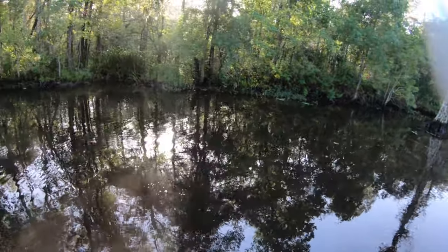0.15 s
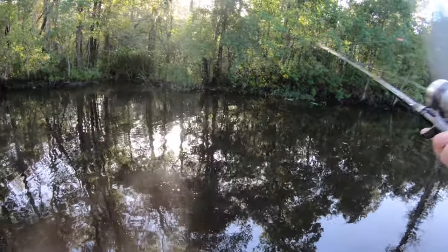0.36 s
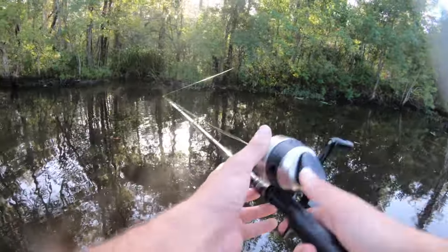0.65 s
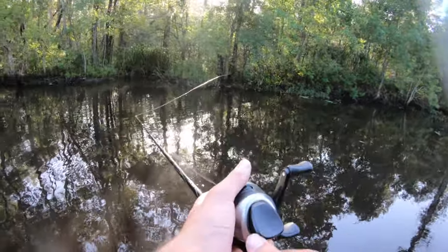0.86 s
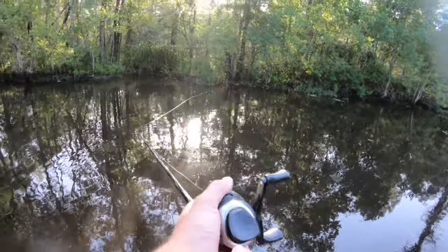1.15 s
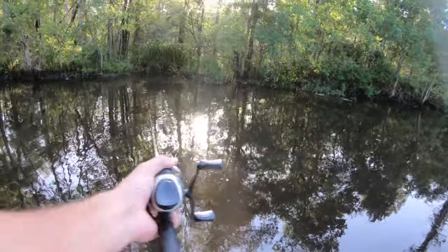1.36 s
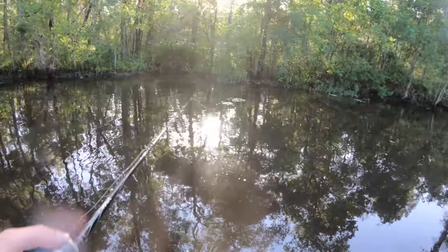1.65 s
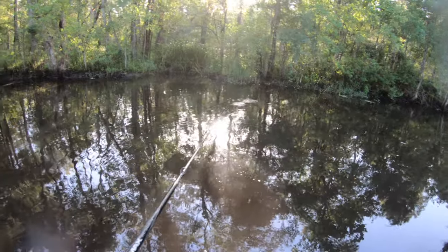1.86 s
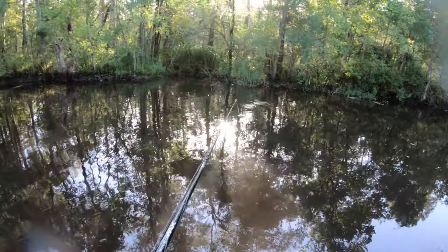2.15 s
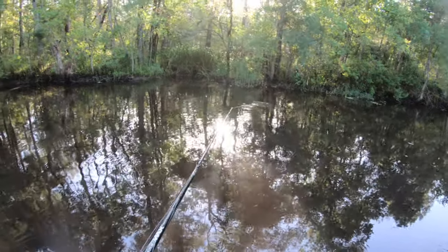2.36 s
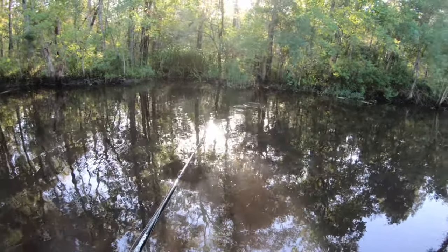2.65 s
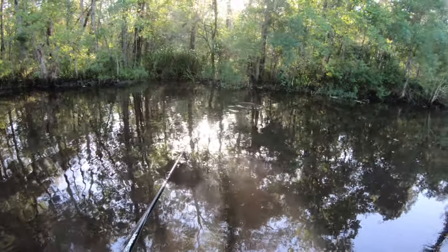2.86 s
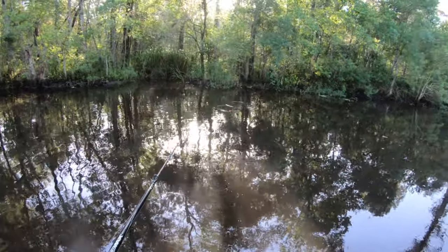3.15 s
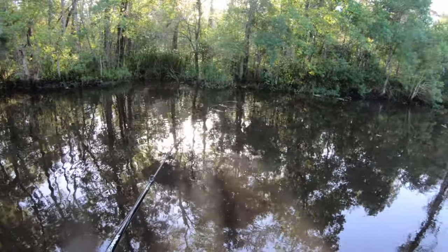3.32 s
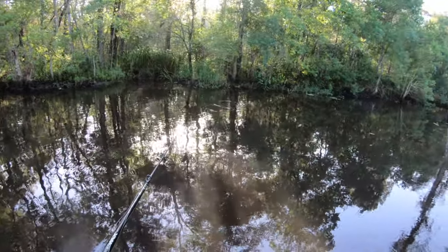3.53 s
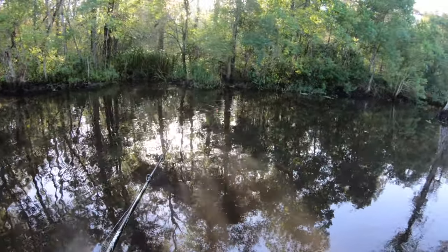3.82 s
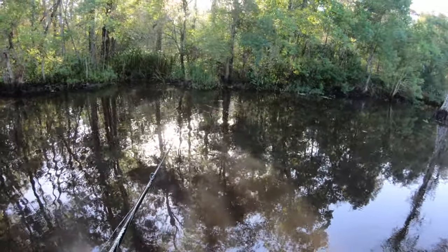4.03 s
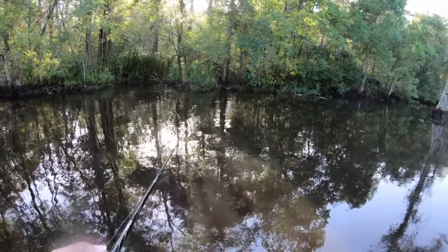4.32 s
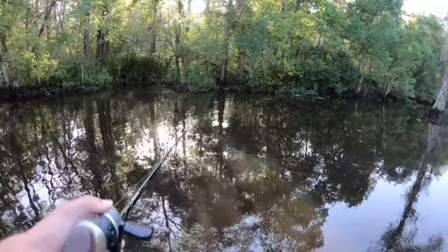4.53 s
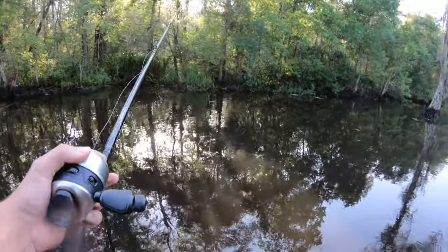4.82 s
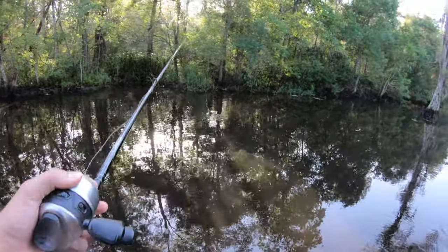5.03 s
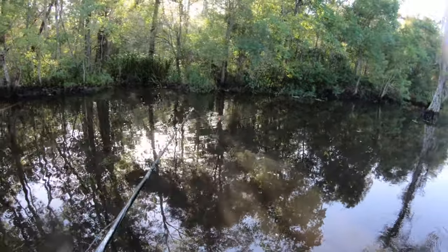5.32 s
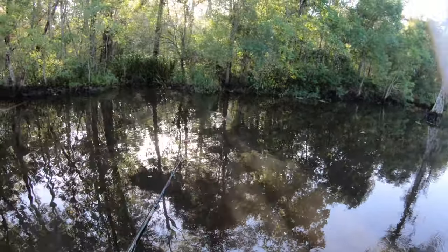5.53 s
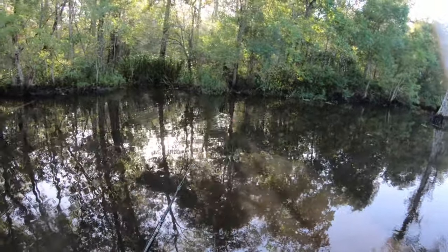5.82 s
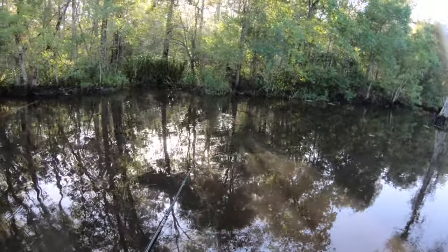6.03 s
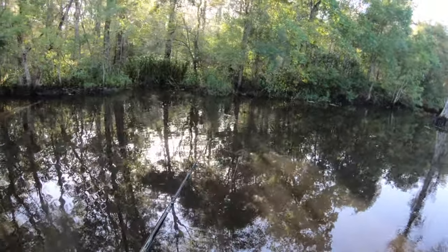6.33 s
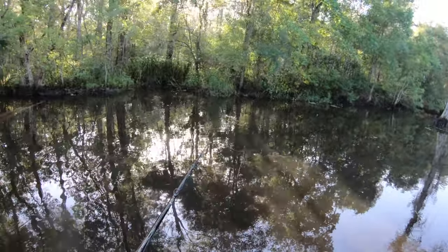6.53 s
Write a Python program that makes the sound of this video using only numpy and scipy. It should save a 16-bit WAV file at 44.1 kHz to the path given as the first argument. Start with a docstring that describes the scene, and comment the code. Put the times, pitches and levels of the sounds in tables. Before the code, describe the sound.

A fishing reel taps, then snaps loudly twice with a brief spring ring, while birds chirp over still swamp water and a distant engine drones.

```python
"""Hands work a fishing reel: taps excite the decaying modes of its housing, its latch snaps twice, a spring rings.
The microphone is worn on the body, whose sway pushes slow pressure waves into it; grainy noise puffs are rubbing
and the tail of the latch snap. Around lies still swamp water among trees: gliding tones are birds near and far,
with echoes as decaying noise. Behind them insects hiss as throbbing noise bands, an engine and other hums drone
in the distance as wavering sines, and filtered noise gives the murmur of the air and low puffs of wind."""
import sys
import numpy as np
from scipy import signal
from scipy.fft import rfft, irfft
from scipy.io import wavfile
from scipy.ndimage import uniform_filter1d

SR = 44100
rng = np.random.default_rng(int(sys.argv[2]) if len(sys.argv) > 2 else 0)


def nominal_scale(level):
    """Amplitude ratio for a level in decibels (scalar or array-like)."""
    x = np.asarray(level, float) / 20
    return 10 ** x


def transcribe(signal):
    """Save signal, clipped to [-1, 1], as a 16-bit WAV file at the path in sys.argv[1]."""
    frames = np.atleast_2d(signal).T
    limited = np.clip(frames, -1, 1)
    pcm = np.round(limited * 32767).astype(np.int16)
    wavfile.write(sys.argv[1], SR, pcm)


N = 294676  # length in samples


def evened(x):
    """Power normalisation: scales a signal to rms 1."""
    return x / np.sqrt(np.mean(x ** 2) + 1e-20)


def curve(rows):
    """Linear interpolation: joins (t/s, value) rows into one value per sample."""
    return np.interp(np.arange(N) / SR, *np.transpose(rows))


def shaped(gain, size=N):
    """Spectral shaping: white noise filtered by gain(f/Hz), then set to rms 1."""
    hz = np.fft.rfftfreq(size, 1 / SR) + 1e-3
    return evened(irfft(rfft(rng.standard_normal(size)) * gain(hz), size))


def bell(hz, centre_hz, octaves):
    """Gaussian response on the log-frequency axis; octaves is the standard deviation."""
    return np.exp(-.5 * (np.log2(hz / centre_hz) / octaves) ** 2)


def add(mix, s, sound):
    """Superposition: adds a sound into the mix from time s."""
    part = mix[round(s * SR):][:len(sound)]
    part += sound[:len(part)]


# spectrum of outdoor murmur and microphone hiss [f/Hz, relative density level/dB]
AIR_SPECTRUM = [(15, -11.5), (25, -3), (40, -15.5), (60, -10.5), (110, -22.5), (250, -29.5), (390, -40.5),
                (600, -43), (1200, -48.5), (2500, -52), (5200, -53), (8400, -48), (16000, -52.5)]


def air_colour(hz):
    """Spectral density of the air noise, interpolated over log frequency."""
    table_hz, level_db = np.transpose(AIR_SPECTRUM)
    return nominal_scale(np.interp(np.log(hz), np.log(table_hz), level_db)) * (hz > 12)


def low_share(hz):
    """Power-complementary crossover: the share of power below about 70 Hz."""
    return 1 / (1 + (hz / 70) ** 4)


def murmur():
    """Stationary broadband noise: the steady upper part of the air sound."""
    return nominal_scale(-42.5) * shaped(lambda hz: air_colour(hz) * np.sqrt(1 - low_share(hz)))


# low puffs of wind [t/s, level/dB]
PUFFS = [(0.05, -38), (0.55, -38), (1.36, -34.5), (1.66, -35), (3.39, -39), (4.0, -41), (4.89, -36),
         (6.5, -42)]


def gusts():
    """Amplitude modulation: low noise swells in Gaussian puffs over a drifting calm."""
    puff_s, calm_db, drift_db = .07, -52, 4
    t = np.arange(N) / SR
    calm = nominal_scale(calm_db + drift_db * shaped(lambda hz: bell(hz, 2.5, 1.2)))
    puffs = sum(nominal_scale(level_db) * np.exp(-((t - s) / puff_s) ** 2) for s, level_db in PUFFS)
    rumble = shaped(lambda hz: air_colour(hz) * np.sqrt(low_share(hz)) * (hz > 20))
    return (calm + puffs) * rumble


# body sway below hearing [t/s, level/dB]
SWAY_LEVEL = [(0.1, -15), (0.37, -12), (0.51, -29), (0.94, -18), (1.2, -33), (1.8, -12), (2.5, -23),
              (2.96, -19), (3.36, -27), (3.75, -18.5), (4.54, -26), (4.94, -11), (5.5, -26), (5.7, -16),
              (6.16, -17), (6.33, -35)]


def sway():
    """Infrasonic pressure: slow noise, its running power levelled so that the table sets the swing."""
    centre_hz, width_hz = 5.9, 3.8
    swing = shaped(lambda hz: hz / (1 + hz) / (1 + ((hz - centre_hz) / width_hz) ** 4))
    swing /= np.sqrt(uniform_filter1d(swing ** 2, 12000) + 0.017)
    return nominal_scale(curve(SWAY_LEVEL)) * swing


# insect choruses [f/Hz, width/Hz (two standard deviations), level/dB, throb centre f/Hz, throb depth/dB rms]
INSECT_BANDS = [(6504, 750, -57.5, 27, 1), (7195, 330, -58.5, 39, 1.5), (7550, 305, -55, 20, 1),
                (12050, 3730, -51.5, 56, 1)]


def insects():
    """Amplitude modulation: many wings blur into narrow noise bands that throb and drift."""
    out = np.zeros(N)
    for centre_hz, width_hz, level_db, throb_hz, depth_db in INSECT_BANDS:
        band = shaped(lambda hz: np.exp(-.5 * ((hz - centre_hz) / width_hz * 2) ** 2))
        throb = shaped(lambda hz: bell(hz, throb_hz, 0.95))
        drift = shaped(lambda hz: bell(hz, .8, 1.2))
        out += band * nominal_scale(level_db + depth_db * throb + 0.63 * drift)
    return out


# engine drawing away [t/s, firing f/Hz, relative level/dB]
ENGINE_COURSE = [(0, 42.24, 1.5), (2.2, 41.94, 3.5), (5.0, 41.67, 0), (6.68, 40.92, -3)]
# partials; fractional multiples are other hums, not of this engine, moved along the same course
# [multiple of firing f, relative rms level/dB]
PARTIALS = [(2, -50), (3, -52.5), (4, -55), (6, -58.5), (7, -63), (8, -63.5), (10, -65.5), (12, -72),
            (14, -74), (.79, -46), (4.55, -59.5), (5.4, -61.5)]


def engine():
    """Additive synthesis: firing orders and other hums waver in level and phase as the air path shifts."""
    s, firing_hz, level_db = np.transpose(ENGINE_COURSE)
    turns = np.cumsum(curve(list(zip(s, firing_hz)))) / SR
    out = np.zeros(N)
    for multiple, partial_db in PARTIALS:
        fade = shaped(lambda hz: bell(hz, 1.63, 0.94))
        wobble = shaped(lambda hz: bell(hz, 2.55, 0.95))
        phase = 2 * np.pi * (multiple * turns + rng.random()) + 0.71 * wobble
        out += np.sqrt(2) * nominal_scale(partial_db + 2.58 * fade) * np.sin(phase)
    return out * nominal_scale(curve(list(zip(s, level_db))))


def trees(x, t60):
    """Reverberation: sparse echoes from trunks and banks build up and die; moving air smears their pitch."""
    echo_share, blur_hz = .15, 150  # share of samples that hold an echo; spread of the smearing
    t = np.arange(SR // 2) / SR
    sparse = rng.standard_normal(len(t)) * (rng.random(len(t)) < echo_share)
    echoes = sparse * nominal_scale(-60 * t / t60) * (1 - np.exp(-t / 0.0031))
    shimmer = shaped(lambda hz: np.exp(-.5 * (hz / blur_hz) ** 2))
    return (.8 + .55 * shimmer) * signal.fftconvolve(x, echoes / np.linalg.norm(echoes))[:N]


def whistle(rows):
    """Frequency modulation: a near sine follows (t/s, f/Hz, level/dB) rows."""
    s, hz, level_db = np.transpose(rows)
    t = np.arange(0, s[-1], 1 / SR)
    tone = np.sin(2 * np.pi * np.cumsum(np.interp(t, s, hz)) / SR)
    return nominal_scale(np.interp(t, s, level_db)) * tone * signal.windows.tukey(len(t), .25)


# countless far chirps together [t/s, level/dB]
CHORUS_LEVEL = [(0, -70), (3.3, -70), (3.7, -64), (4.9, -61), (5.6, -66), (6.0, -72), (6.68, -68)]


def chorus():
    """Random superposition: short gliding chirps, too far off to tell apart."""
    centre_hz, spread_octaves, chirps_per_s = 2900, .2, 130
    out = np.zeros(N)
    for when, pitch, glide, size in rng.random((round(chirps_per_s * N / SR), 4)):
        octaves = spread_octaves * np.log(pitch / (1 - pitch))  # logistic scatter
        hz = np.clip(centre_hz * 2 ** octaves, 1400, 5200)
        end = (.01 + .03 * size, hz * (.9 + .2 * glide), -6 * size)  # longer chirps are softer
        add(out, when * N / SR, whistle([(0, hz, -6 * size), end]))
    return nominal_scale(curve(CHORUS_LEVEL)) * evened(out)


# far bird, a high note then a low one [t/s, high level/dB, low level/dB]
FAR_SONG = [(3.54, -69, -68), (3.815, -61, -68), (4.15, -62, -68), (4.38, -64, -67), (4.71, -66, -66),
            (4.99, -61, -67), (5.3, -61, -67), (5.62, -66, -67)]


def far_bird():
    """Tone pairs, high then low, whose frequency sags linearly as the song goes on."""
    sag_hz_per_s, high_s, low_s, low_wait_s = 55, .04, .1, .11
    out = np.zeros(N)
    for s, high_db, low_db in FAR_SONG:
        sag_hz = sag_hz_per_s * (s - FAR_SONG[0][0])
        high_hz, low_hz = 3000 - sag_hz, 2745 - sag_hz
        add(out, s, whistle([(0, high_hz, high_db), (high_s, high_hz, high_db - 4)]))
        add(out, s + low_wait_s, whistle([(0, low_hz, low_db), (low_s, low_hz, low_db)]))
    return out


# lone gliding whistles [t/s, length/s, relative level/dB, start f/Hz, end f/Hz]
GLIDES = [(.205, .06, -59, 3550, 3130), (0.414, 0.02, -49.5, 3550, 3490), (1.324, 0.014, -52, 3300, 3950),
          (1.743, 0.012, -52, 1530, 1600), (2.07, 0.015, -54, 3550, 4070), (2.335, .048, -61, 3660, 3680),
          (4.06, .15, -62, 3800, 3780), (4.41, .062, -57, 1645, 1655), (4.48, .03, -57, 3280, 3300),
          (4.755, .09, -62, 4270, 4250)]


def single_notes():
    """Linear frequency glides at constant level."""
    out = np.zeros(N)
    for s, length, level_db, start_hz, end_hz in GLIDES:
        add(out, s, nominal_scale(level_db) * whistle([(0, start_hz, -2), (length, end_hz, -2)]))
    return out


# one arched note [t/s after start, share of top f, relative level/dB]
ARCHED_NOTE = [(0, .89, -4), (.011, 1, 0), (.022, .96, -5)]
# its repeats [t/s, level/dB, top f/Hz]
TWITTERS = [(0.063, -53, 3800), (.115, -51, 4000), (.688, -51, 3850), (.738, -46, 3850), (.795, -54, 3750),
            (.855, -54, 3700), (.905, -57, 3600), (2.69, -64, 3620), (2.745, -61, 3660), (2.815, -63, 3650),
            (2.91, -62, 3580), (2.95, -61, 3700), (3.005, -59, 3660), (3.09, -63, 3600)]


def twittering_bird():
    """Frequency scaling: one arched contour repeats at varying top pitch."""
    out = np.zeros(N)
    for s, level_db, top_hz in TWITTERS:
        add(out, s, nominal_scale(level_db) * whistle(np.array(ARCHED_NOTE) * [1, top_hz, 1]))
    return out


# low note just before each hook [t/s after start, f/Hz, relative level/dB]
PICKUP_NOTE = [(0, 3060, -3), (.009, 3210, 1), (.018, 3340, -4)]
# hooked note [t/s after start, f/Hz, relative level/dB]
HOOKED_NOTE = [(0, 4460, 3), (.012, 4500, 0), (.024, 4700, 0), (.034, 4280, 4.5), (.046, 3990, 5),
               (.06, 3970, 2)]
# repeats of the hook [t/s, level/dB]
HOOK_TIMES = [(0.156, -54), (1.247, -55), (1.806, -52.5), (6.488, -58)]


def hooking_songbird():
    """Frequency contour: a low rising note leads into one that rises, then drops."""
    out = np.zeros(N)
    for s, level_db in HOOK_TIMES:
        add(out, s - .021, nominal_scale(level_db) * whistle(PICKUP_NOTE))
        add(out, s, nominal_scale(level_db) * whistle(HOOKED_NOTE))
    return out


# soft falling lead-in [t/s after start, f/Hz, relative level/dB]
FALLING_NOTE = [(0, 5000, -19), (.008, 4802, -1), (.016, 4550, 7)]
# fast rise [t/s after start, f/Hz, relative level/dB]
RISING_NOTE = [(0, 3750, -8), (.004, 3950, -3), (.016, 4900, 0), (.023, 5200, -4)]
# repeats of the pair [lead-in t/s, rise level/dB, lead-in level/dB]
CHIP_TIMES = [(3.421, -49.5, -70), (3.709, -43.5, -53.5), (3.998, -46.5, -56), (4.286, -47, -54),
              (4.585, -48, -54), (4.886, -53.5, -62), (5.194, -49, -60)]


def chipping_bird():
    """Frequency sweeps: a falling lead-in, then a fast rise."""
    rise_wait_s = .021
    out = np.zeros(N)
    for s, level_db, lead_db in CHIP_TIMES:
        add(out, s, nominal_scale(lead_db) * whistle(FALLING_NOTE))
        add(out, s + rise_wait_s, nominal_scale(level_db) * whistle(RISING_NOTE))
    return out


def birds():
    """Direct-to-reverberant ratio: near birds are clear with an echo, the far one is mostly echo."""
    air_path = shaped(lambda hz: bell(hz, 67, 0.65))  # level flutter, 2 dB near and 4 dB far
    near = single_notes() + twittering_bird() + hooking_songbird() + chipping_bird()
    near *= nominal_scale(2.0 * air_path)
    far = far_bird() * nominal_scale(4 * air_path)
    return near + trees(near, 0.75) + far + nominal_scale(2.5) * trees(far, 0.78) + trees(chorus(), 0.6)


# hand, cloth and line rubbing; the puff at 2.161 s is the noisy tail of the latch snap
# [t/s, time scale/s, relative level/dB, centre f/Hz, width/octaves]
NOISE_PUFFS = [(0.024, 0.028, -47, 920, 0.12), (0.561, 0.087, -44.5, 3500, 2.7),
               (0.563, .008, -33, 9300, 0.18), (0.621, 0.24, -51, 3000, 3.6), (0.68, .5, -58, 1450, .22),
               (0.754, 0.56, -55, 1900, 1.6), (.84, .15, -57, 2280, .08), (2.161, 0.091, -40.5, 1200, 0.69),
               (3.752, 0.048, -49, 1140, 0.65), (4.743, 0.29, -52, 1810, 1.1), (5.528, .06, -43, 1500, 2.2),
               (5.587, 0.12, -46.5, 3900, .26), (5.762, 0.16, -55.5, 2200, 0.73),
               (6.361, .07, -52.5, 900, 1.1)]


def rustles():
    """Modulated noise: grainy puffs of rubbing, and the tail of the latch snap, rise fast and fade."""
    out = np.zeros(N)
    for s, length, level_db, centre_hz, octaves in NOISE_PUFFS:
        u = np.arange(8192 * 2) / SR / length
        grain = nominal_scale(1.8 * shaped(lambda hz: bell(hz, 60, 1.2), size=len(u)))
        puff = shaped(lambda hz: bell(hz, centre_hz, octaves), size=len(u))
        envelope = (1 - np.exp(-u / 0.027)) * np.exp(-1.6 * u ** 1.24)
        add(out, s, nominal_scale(level_db) * puff * grain * envelope)
    return out


def ring(modes, t):
    """Modal synthesis: a sum of exponentially decaying sines."""
    return sum(nominal_scale(level_db - 60 * t / t60) * np.sin(2 * np.pi * hz * t) for hz, level_db, t60 in modes)


# spring modes [f/Hz, level/dB, t60/s]
SPRING_MODES = [(3670, -35.5, 0.69), (6600, -36.5, 0.14), (1354, -32, 0.19)]


def spring():
    """Free vibration, then damping: the latch frees a spring and a touch stills it."""
    freed_s, damped_s = 2.164, 2.268
    t = np.arange(9000) / SR
    damper = 1 / (1 + np.exp((t + freed_s - damped_s) / 0.006))
    out = np.zeros(N)
    add(out, freed_s, ring(SPRING_MODES, t) * damper * (1 - np.exp(-t / 0.0016)))
    return out


# reel housing modes [f/Hz, relative level/dB, t60/s when ringing freely]
HOUSING_MODES = [(470, -5.5, 0.027), (620, -3, 0.034), (817, 1, 0.061), (985, -4, 0.034), (1274, 0, 0.024),
                 (1520, -1, 0.05), (1702, -3, 0.046), (1904, -1.5, .025), (2200, -4.5, 0.031),
                 (2560, -2.5, 0.028), (3050, -4, 0.02), (3410, -7, 0.048), (3750, -3, 0.016),
                 (4130, -2.5, 0.037), (4780, -5, 0.017), (5460, -5, 0.015), (6530, -4, .01),
                 (8700, -5, 0.015), (9840, -7, 0.0087), (12140, -4.5, 0.0079), (14400, -14, .005)]


def housing(colour, colour_hz):
    """Modal response: the striking place weights the modes, and a held housing rings shorter."""
    t = np.arange(4000) / SR
    hold = np.clip(880 / colour_hz, .46, 1)  # taps coloured below 880 Hz ring freely
    body = np.zeros(len(t))
    for k, (hz, level_db, t60) in enumerate(HOUSING_MODES):
        weight = colour(hz) + nominal_scale(-22)  # every mode sounds a little
        body += (-1) ** k * weight * ring([(hz, level_db, t60 * hold)], t)
    return body


def rattle(level_db):
    """Impulse train: one hard tick, then random ones dying away; harder taps rattle longer."""
    length = max(.0055 + .00008 * level_db, .001)
    when, size = rng.random((2, 500))
    ticks = (when < 4000 / SR) * 0.39 * (2 * size - 1)  # 4000 ticks per second on average
    ticks *= np.exp(-(np.arange(500) / SR / length) ** 2)
    ticks[0] = 1
    return ticks


# taps and snaps [t/s, relative level/dB, colour f/Hz, colour width/octaves, upper colour relative level/dB]
REEL_TAPS = [(0.014, -30, 1830, .2, -4), (0.023, -33, 1680, .7, -30), (.305, -25.5, 800, .5, -2),
             (.381, -16, 1700, .45, -8), (.803, -31.5, 1570, .4, -30), (.811, -35.5, 1800, .33, -30),
             (0.913, -37.5, 900, .8, -20), (1.285, -32, 1200, .12, -30), (1.294, -25, 900, .7, -14),
             (2.029, -39, 1600, .7, -15), (2.036, -42, 1800, .7, -10), (2.089, -29, 4000, .8, 6),
             (2.093, -33, 3800, .8, 2), (2.102, -28, 1490, 1, -30), (2.107, -8.5, 2950, .25, -30),
             (2.108, -6.5, 870, .8, -30), (2.155, -25, 1400, .4, -30), (2.162, -2.5, 1800, 2.4, -4),
             (2.170, -20, 1700, .7, -30), (2.304, -40.5, 1550, .3, -30), (4.566, -38, 1700, .6, -30),
             (4.743, -41, 3500, .23, -30), (4.77, -37.5, 1190, .24, -30), (4.849, -39, 1600, .16, -30),
             (4.862, -23, 1530, .13, -30), (4.904, -41, 900, .44, -30), (5.527, -19.5, 4300, .55, -30),
             (5.531, -27, 1850, .12, -30), (6.548, -34, 4680, .27, -30)]


def reel():
    """Source-filter excitation: each tap is a rattle into the housing, coloured by where it lands."""
    upper_ratio = 2.4  # upper colour over lower
    out = np.zeros(N)
    for s, level_db, colour_hz, octaves, upper_db in REEL_TAPS:
        def colour(hz):
            """Spectral weighting by two humps."""
            upper = nominal_scale(upper_db) * bell(hz, upper_ratio * colour_hz, octaves)
            return bell(hz, colour_hz, octaves) + upper
        reach = 2 ** (2.2 * octaves * np.array([-1, 1]))
        edges = np.clip(colour_hz * reach * [1, upper_ratio], 400, 17000)
        band = signal.butter(1, edges, "band", fs=SR, output="sos")
        tap = signal.sosfilt(band, np.convolve(rattle(level_db), housing(colour, colour_hz)))
        loudest = uniform_filter1d(tap ** 2, size=88).max()  # power of the loudest 2 ms
        add(out, s, nominal_scale(level_db) * tap / np.sqrt(loudest * 4))
    return out + spring()


def scene():
    """Linear superposition: all sources at one microphone."""
    background = murmur() + gusts() + sway() + insects() + engine()
    return (background + birds() + rustles() + reel())[None]


def roll_off(x):
    """The treble ends steeply here."""
    return signal.sosfilt(signal.butter(12, 16210, fs=SR, output="sos"), x)


def record(dry):
    """Band limitation: a linear-phase low-pass at 15.8 kHz finishes the mix."""
    lowpass = signal.firwin(numtaps=801, cutoff=15800, window=("kaiser", 9), fs=SR)
    finished = signal.oaconvolve(dry, lowpass[None], "same")
    return roll_off(finished)


dry = scene()
out = record(dry)
transcribe(out)
```